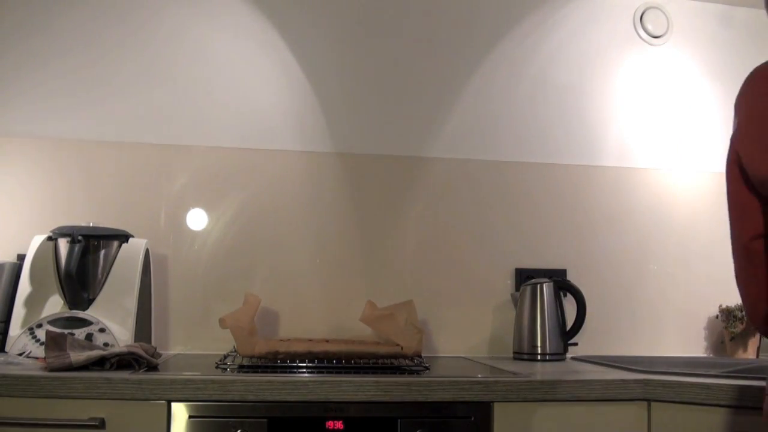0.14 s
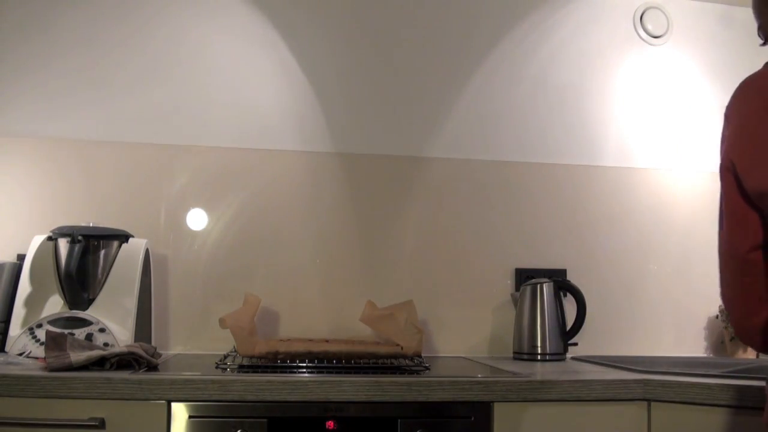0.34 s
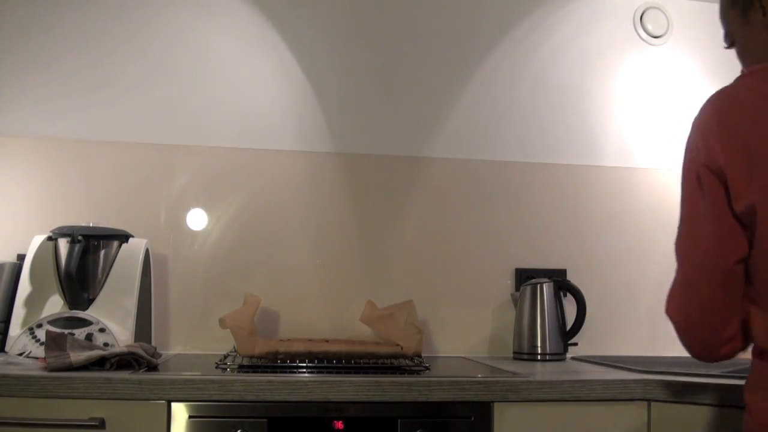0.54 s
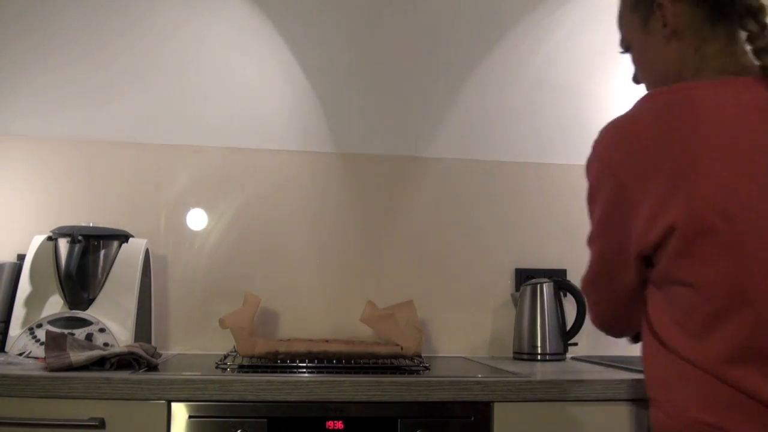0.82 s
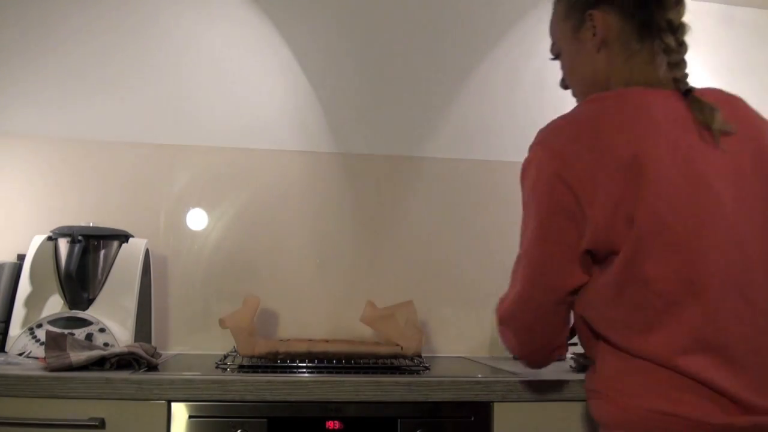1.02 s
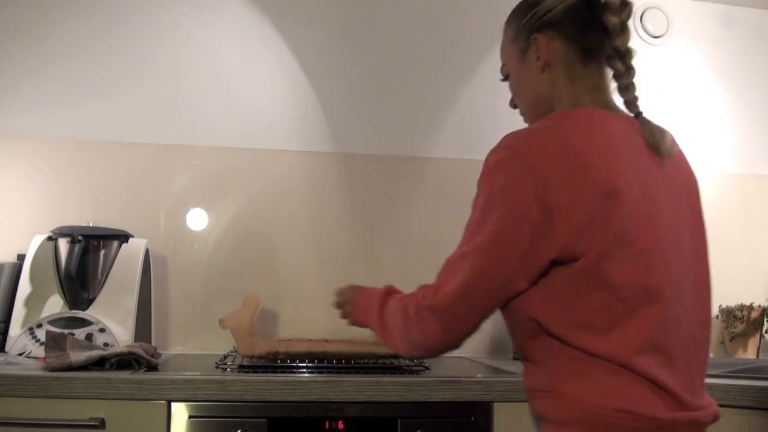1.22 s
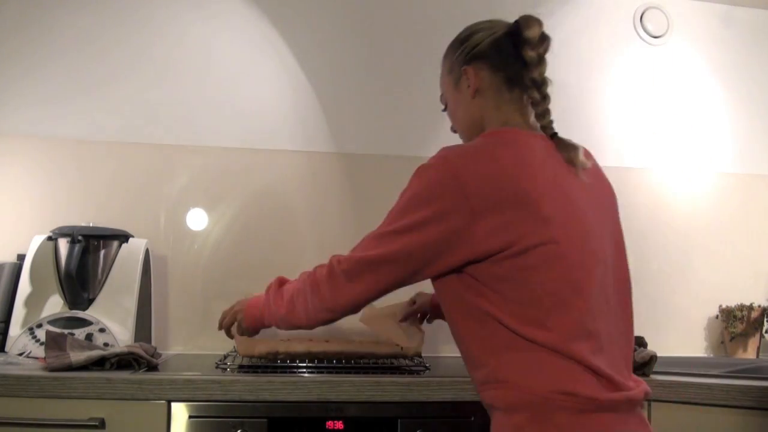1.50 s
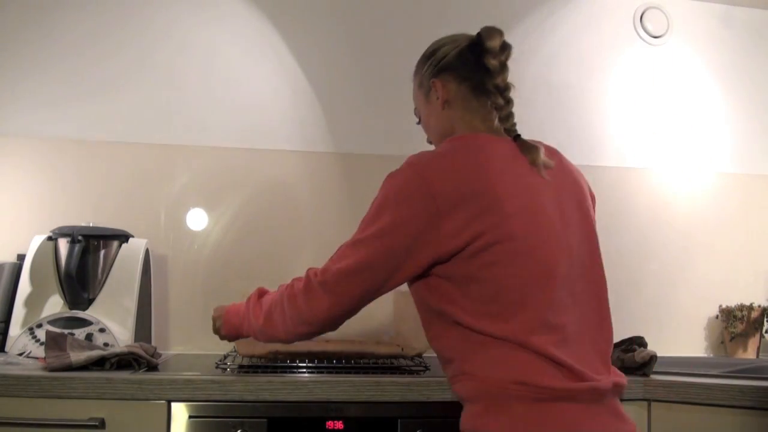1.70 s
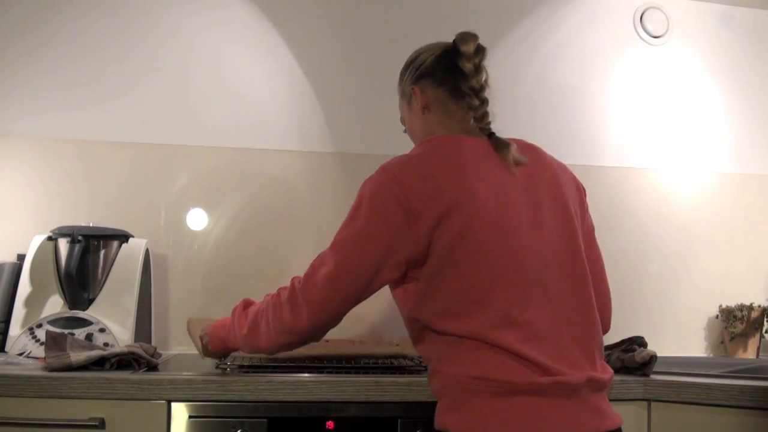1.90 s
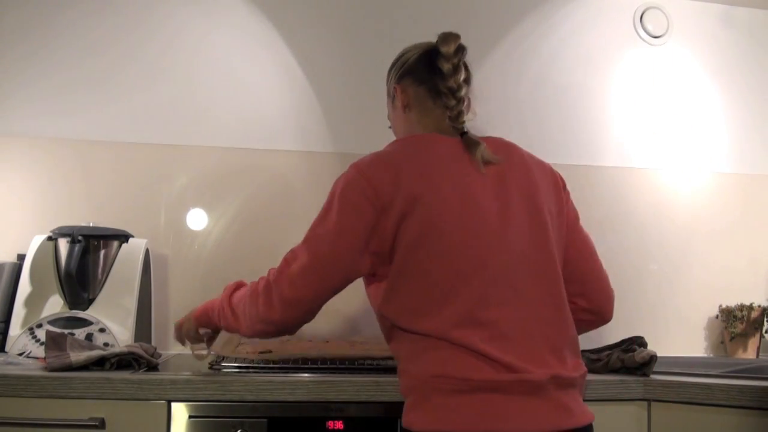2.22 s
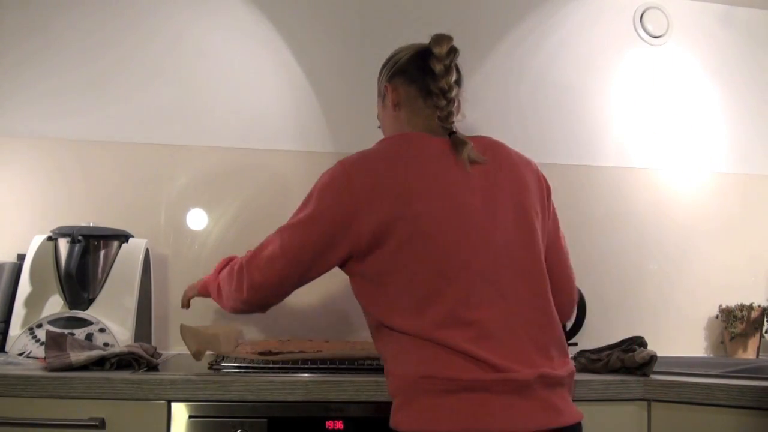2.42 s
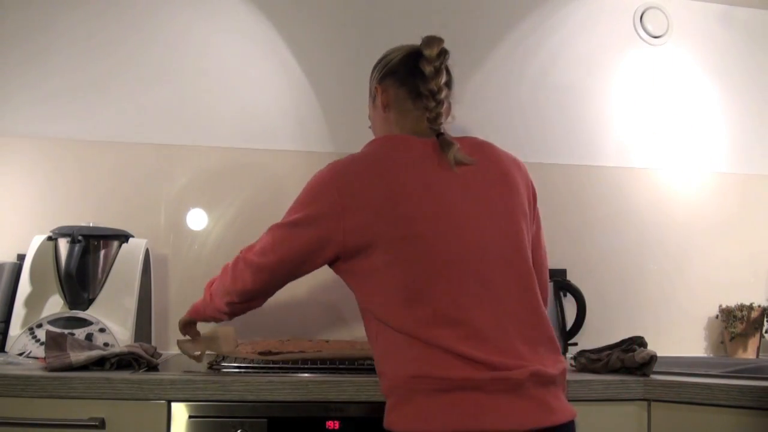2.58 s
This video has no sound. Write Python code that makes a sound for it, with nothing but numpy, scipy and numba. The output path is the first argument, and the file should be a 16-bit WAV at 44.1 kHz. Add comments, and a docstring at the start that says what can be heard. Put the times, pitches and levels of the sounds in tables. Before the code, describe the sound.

Loud crisp paper rustling with sharp creases and a dull scrape; before it, a drawer rumbles and slams with ringing panels, then soft cloth movement. Hard-walled kitchen, quiet room air, somewhat distant camera microphone.

```python
"""First a drawer rolls in, off to one side of a hard-walled kitchen, and bangs shut: rumble and thin tones
of the runners, then noise cracks, a low thud and decaying panel tones. A sleeve swishes over soft steps.
Then hands grip the baking paper under a cake and drag it across a rack: thousands of tiny creases snap
over the dull scrape of the sheet. Each spot has its own reflections and stereo width at the microphone,
over a faint oven fan and room air. The camera's limiter flattens the bang."""
import sys
import numpy as np
from scipy import signal
from scipy.fft import rfft, irfft
from scipy.io import wavfile
from scipy.ndimage import uniform_filter1d
from numba import njit

SR = 44100
rng = np.random.default_rng(int(sys.argv[2]) if len(sys.argv) > 2 else 0)


def persist_wave(psi):
    """Save psi, clipped to +-1, as 16-bit WAV."""
    counts = np.round(np.clip(psi, -1, 1) * 32767).astype(np.int16)
    wavfile.write(sys.argv[1], SR, np.atleast_2d(counts).T)


N = 121275  # samples, 2.75 s

# All levels are relative, ahead of the limiter; colours give only the shape of a spectrum.
# How hard the paper is worked: gripped, dragged, eased, worked again [t/s, level/dB]
PAPER_EFFORT = [(1.58, -76), (1.602, -22.5), (1.628, -17), (1.715, -20), (1.75, -23), (1.812, -22),
                (1.885, -17), (2.02, -23.5), (2.10, -28), (2.185, -38), (2.21, -27), (2.245, -28),
                (2.285, -15.5), (2.35, -22.5), (2.40, -33.5), (2.46, -54), (2.53, -56), (2.62, -38),
                (2.645, -36.5), (2.705, -37.5), (2.745, -24.5)]
# The sheet sliding under the cake's weight [t/s, level/dB]
SLIDE = [(1.6, -49.5), (1.645, -32.5), (1.75, -40.5), (1.83, -36), (1.93, -33.5), (2.04, -40), (2.19, -66),
         (2.33, -36.5), (2.45, -60), (2.75, -44.5)]
# Single loud creases [t/s, level/dB]
SNAPS = [(1.602, -6), (1.6097, 2), (1.622, 6), (1.638, 7), (1.706, 9), (1.829, 8), (1.88, 7), (2.195, 8),
         (2.272, 3), (2.439, -1), (2.6308, -5), (2.656, -9)]
# Colour of the creases [f/Hz, level/dB]
PAPER_COLOUR = [(120, -42), (250, -17), (400, -11), (900, -10), (1500, -3), (2200, 0), (3500, 0), (6000, 0),
                (8000, -2), (10000, -5.5), (12000, -8), (14000, -13), (16000, -17.5)]
# Colour of the scrape [f/Hz, level/dB]
SLIDE_COLOUR = [(80, -18), (200, -8.5), (330, 1), (800, 1), (1400, -2), (3000, -4.5), (8000, -43)]
CREASES_PER_S, CREASE_SPREAD_DB, CREASE_DECAY_S = 1200, 4, 0.00027
FOLDS_PER_S, FOLD_DB = 60, 3  # creases come in flurries
SNAP_T60_S, SNAP_DULL_HZ = 0.026, 7100
PAPER_DB, DULL_HZ, BRIGHTEN = 0.5, 5000, 0.24  # harder work gives more treble (dB per dB)

# Contacts as the drawer shuts: the blow, then its contents settling [t/s, level/dB]
BLOWS = [(0.2253, 18), (.239, 15.5), (.254, 19), (.29, 8), (.327, 13.5)]
# Colour of a contact [f/Hz, level/dB]
BLOW_COLOUR = [(30, -42), (70, -22.5), (150, -12.5), (280, -3), (600, 0.5), (850, -3.5), (1300, -2),
               (2000, -6.5), (2650, -8), (3100, -11), (4100, -19.5), (6500, -23), (9500, -33.5),
               (16000, -47.5)]
# Panel modes of the drawer [f/Hz, level/dB]
PANELS = [(238, -11), (266, -9), (344, -3), (419, -5), (534, -6), (617, -5), (667, -1), (1101, -5),
          (1147, -7), (1227, -3), (1487, 1), (1583, -5), (1686, -7), (1875, -8), (1992, -7), (2057, -8)]
CRACK_T60_S, PANEL_DB, PANEL_T60_S, PANEL_BUILD_S = 0.015, -0.5, 0.73, 0.035
THUD_DB, THUD_HZ, THUD_T60_S = -2.5, 116, 0.31  # the cabinet's low thud

# Resonances of the rollers [f/Hz, width/Hz, level/dB]
ROLLERS = [(590, 14, -4), (705, 8, 0), (1070, 14, -1.5), (1228, 18, -7), (1490, 14, -11), (1708, 14, -12)]
# Colour of their rumble [f/Hz, level/dB]
ROLL_COLOUR = [(60, -21), (150, -7), (300, -3), (600, 1.5), (850, -5), (1100, 0), (1500, -9), (2200, -11),
               (3500, -22.5), (7000, -28), (15000, -49)]
# The roll starts PUSH_DB louder and settles with time constant PUSH_S
ROLL_DB, ROLL_RING_DB, PUSH_DB, PUSH_S = -39.5, -0.5, 11.5, 0.033
ROLL_WAVER = 0.36  # noise beside each tone: roughness of the runners' song

# Swishes of a sleeve [t/s, length/s, level/dB]
SWISHES = [(0.561, 0.11, -49.5), (.755, 0.031, -51.5), (.96, 0.027, -62), (1.046, 0.036, -73),
           (1.186, 0.03, -48), (1.278, 0.091, -53), (1.374, 0.0057, -46.5), (1.5, .05, -56)]
# Colour of the cloth [f/Hz, level/dB]
CLOTH_COLOUR = [(200, -9), (1500, -9), (4000, -2.5), (7000, 0), (11000, -4.5), (16000, -15.5)]
# Soft steps and bumps [t/s, level/dB, f/Hz]
STEPS = [(0.134, -19, 85), (0.149, -6.5, 200), (.186, -5.5, 453), (.965, -17.5, 583), (1.08, -21, 1200),
         (1.375, -19.5, 350)]
SWISH_ATTACK_S, SWISH_RELEASE_S, STEP_T60_S = 0.0046, 0.0067, 0.094

# Tones of the oven fan [f/Hz, level/dB]
FAN_HUM = [(142, -63), (187, -63)]
# Colour of the room air [f/Hz, level/dB]
AIR_COLOUR = [(15, -48), (25, -3.5), (92, -1), (149, -2), (301, 3), (516, -6), (607, -1.5), (1370, -9.5),
              (1840, -9.5), (7110, -17), (14800, -24.5), (16000, -24)]
AIR_DB = -52

# The kitchen's decay [f/Hz, t60/s]
ROOM_T60 = [(100, 0.6), (500, 0.61), (1500, 0.82), (2800, 0.8), (5000, 0.78), (9000, 0.52), (16000, 0.28)]
# Stereo width of the drawer, side over mid [f/Hz, level/dB]
DRAWER_WIDTH = [(80, -21), (330, -16.5), (500, -11.5), (660, -10), (900, -4.5), (1100, -8), (1900, -9),
                (2500, -7.5), (3800, -10), (4400, -15), (7600, -22), (9500, -13), (11000, -3), (15000, -5)]
# Stereo width of the worktop, side over mid [f/Hz, level/dB]
WORKTOP_WIDTH = [(80, -26), (350, -24), (600, -15.5), (850, -7.5), (1100, -13), (1350, -8.5), (1650, -12),
                 (2600, -10), (4100, -11), (5500, -19.5), (9300, -14.5), (10500, -5.5), (12500, -2.5),
                 (15500, -11)]
# Stereo width of the air and the cook, side over mid [f/Hz, level/dB]
AIR_WIDTH = [(60, -25), (110, -20), (200, -22), (380, -12.5), (700, -8.5), (1290, -4), (2380, -3.5),
             (4400, -6.5), (8120, -11.5), (15000, -2)]
ROOM_ONSET_S = 0.0012
# Direct sound over reflections: lower sounds further from the microphone
PAPER_DIRECT_DB, DRAWER_DIRECT_DB, ROLL_DIRECT_DB, CLOTH_DIRECT_DB = -10.5, -12.5, -6, -3.5
LIMIT_DB, LIMIT_ATTACK_S, LIMIT_RELEASE_S, TOP_HZ = -12.5, 0.00056, 0.028, 15750


def paper(count=6):
    """Several patches of the sheet rustle at once on the worktop; a few creases snap loudly."""
    patches = sum(in_kitchen(paper_patch(), PAPER_DIRECT_DB, WORKTOP_WIDTH) for _ in range(count))
    rustle = patches / np.sqrt(count)
    snaps = colour(sum(undb(db) * burst(s, SNAP_T60_S) for s, db in SNAPS), PAPER_COLOUR)
    snaps = signal.lfilter(*signal.butter(1, SNAP_DULL_HZ, fs=SR), snaps)
    return rustle + in_kitchen(snaps, PAPER_DIRECT_DB, WORKTOP_WIDTH)


def paper_patch():
    """One patch of the sheet: creases snap in flurries, brighter under effort, over a lower scrape."""
    effort = curve(PAPER_EFFORT)
    held = seconds() > PAPER_EFFORT[0][0]
    crinkle = grains(CREASES_PER_S, CREASE_SPREAD_DB, CREASE_DECAY_S) * undb(effort + PAPER_DB) * held
    dull = signal.lfilter(*signal.butter(1, DULL_HZ, fs=SR), crinkle)
    treble_gain = undb(BRIGHTEN * (effort - effort.max()) + 0.5)
    # dull and bright parts waver independently
    crinkle = dull * flurries() + (crinkle - dull) * flurries() * treble_gain
    scrape = colour(grains(900, 4, 0.00035), SLIDE_COLOUR) * undb(curve(SLIDE)) * held
    return colour(crinkle, PAPER_COLOUR) + scrape


def flurries():
    """A quickly wandering gain, rms 1."""
    knots = rng.standard_normal(1000)
    wander = np.interp(seconds() * FOLDS_PER_S, np.arange(len(knots)), knots)
    return unit(undb(FOLD_DB * wander))


def drawer():
    """Each contact cracks into the room; the cabinet thuds and the panels ring on."""
    cracks = 0
    for start, db in BLOWS:
        crack = undb(db) * colour(burst(start, CRACK_T60_S), BLOW_COLOUR)
        cracks = cracks + in_kitchen(crack, DRAWER_DIRECT_DB, DRAWER_WIDTH)
    thud = burst(BLOWS[0][0], THUD_T60_S)
    for _ in range(2):
        thud = resonate(thud, THUD_HZ, THUD_HZ)
    thud = undb(THUD_DB) * thud / np.linalg.norm(thud)
    return cracks + thud + stereo(panels(), panels(), DRAWER_WIDTH)


def panels():
    """The drawer's panels take up the blow and ring on as decaying tones of random phase."""
    start, blow_db = BLOWS[0]
    t = seconds()
    swell = fade(start, PANEL_T60_S) * (1 - np.exp(-np.abs(t - start) / PANEL_BUILD_S))
    ring = swell * sum(undb(db) * np.sin(2 * np.pi * (hz * t + rng.random())) for hz, db in PANELS)
    return undb(blow_db + PANEL_DB) * ring / np.linalg.norm(ring)


def rollers():
    """The runners rumble and sing until the drawer hits its stop."""
    t = seconds()
    push = undb(ROLL_DB + PUSH_DB * np.exp(-t / PUSH_S)) * (t < BLOWS[0][0])
    rumble = colour(grains(1700, 2.2, 0.00026), ROLL_COLOUR) * push
    song = undb(ROLL_RING_DB) * push * stereo(runner_song(), runner_song(), DRAWER_WIDTH)
    return song + in_kitchen(rumble, ROLL_DIRECT_DB, DRAWER_WIDTH)


def runner_song():
    """Thin tones of the runners, each roughened by narrow noise at its pitch; rms 1."""
    song = 0
    for hz, width, db in ROLLERS:
        tone = np.sin(2 * np.pi * (hz * seconds() + rng.random()))
        # the second half of the noise is past the resonance's build-up
        rough = unit(resonate(rng.standard_normal(2 * N), hz, width)[N:])
        song = song + undb(db) * (tone + ROLL_WAVER * rough)
    return unit(song)


def cook():
    """Cloth swishes as coloured grains; soft steps as resonant noise bursts."""
    t = seconds()
    rub = 0
    for start, length, db in SWISHES:
        attack = np.clip((t - start) / SWISH_ATTACK_S, 0, 1)
        release = np.exp(-np.maximum(t - start - length, 0) / SWISH_RELEASE_S)
        rub = rub + undb(db) * attack * release
    steps = 0
    for start, db, hz in STEPS:
        narrowing = np.sqrt(SR / (np.pi * hz))  # makes up the energy the resonance removes
        steps = steps + undb(db) * narrowing * resonate(burst(start, STEP_T60_S), hz, hz)
    return rub * colour(grains(5000, 2.4, 0.00024), CLOTH_COLOUR) + steps


def oven_fan():
    """Steady hum: noise through pairs of narrow resonances."""
    hum = 0
    for hz, db in FAN_HUM:
        tone = resonate(resonate(rng.standard_normal(N), hz, 8.6), hz, 8.6)
        hum = hum + undb(db) * unit(tone)
    return hum


def air():
    """Quiet room noise, steady and coloured."""
    return undb(AIR_DB) * colour(rng.standard_normal(N), AIR_COLOUR)


def in_kitchen(x, direct_db, width):
    """A sound from one spot of the kitchen, with that spot's own reflections."""
    direct = undb(direct_db)
    mid = (direct * x + convolve(x, room_tail())) / np.hypot(1, direct)
    return stereo(mid, convolve(x, room_tail()), width)


def room_tail():
    """Dense reflections of tiles and walls; each band dies at its own rate."""
    hz = np.fft.rfftfreq(N, 1 / SR)
    noise, out = rfft(rng.standard_normal(N)), 0
    for (_, t60), share in zip(ROOM_T60, np.eye(len(ROOM_T60))):
        shape = fade(0, t60) * (1 - np.exp(-seconds() / ROOM_ONSET_S))
        # overlapping bands, each peaking at its own row
        band = at_hz(np.c_[np.array(ROOM_T60)[:, 0], share], hz)
        out = out + irfft(noise * band, N) * shape / np.linalg.norm(shape)
    return out


def stereo(mid, side, width):
    """Left and right from a middle and a side signal."""
    gain = undb(at_hz(width, np.fft.rfftfreq(2 * N, 1 / SR)))
    side = irfft(rfft(side, 2 * N) * gain)[:N]
    return np.array([mid + side, mid - side])


def grains(rate, spread_db, decay_s):
    """Random tiny snaps, each with its own size and pitch; rms 1."""
    count = int(rate * N / SR)
    when, pitch, chance = rng.random((count, 3)).T
    age = np.arange(128) / SR
    size = undb(spread_db * np.minimum(-np.log(1 - chance), 3))  # a few are much louder
    tones = np.cos(np.pi * SR * pitch[:, None] * age)
    rings = size[:, None] * np.exp(-age / decay_s) * tones
    places = (when * N).astype(int)[:, None] + np.arange(len(age))
    return unit(np.bincount(places.ravel(), rings.ravel(), N)[:N])


def burst(start, t60):
    """A decaying crack of noise with unit energy."""
    x = rng.standard_normal(N) * fade(start, t60)
    return x / np.linalg.norm(x)


def fade(start, t60):
    """Exponential decay from a given moment, 60 dB in t60 seconds."""
    age = seconds() - start
    return (age >= 0) * np.exp(-np.log(1000) * np.abs(age) / t60)


def resonate(x, hz, width):
    """One resonance, gain 1 at its centre."""
    return signal.lfilter(*signal.iirpeak(hz, hz / width, fs=SR), x)


def colour(x, rows):
    """Causal minimum-phase filter with the given spectrum; white noise keeps its power."""
    size = 4096
    cep = irfft(np.log(undb(at_hz(rows, np.fft.rfftfreq(size, 1 / SR)))))
    # fold the cepstrum so that the response starts at once
    cep[1:size // 2] *= 2
    cep[size // 2 + 1:] = 0
    response = irfft(np.exp(rfft(cep)))
    return convolve(x, response / np.linalg.norm(response))


def convolve(x, response):
    """Pass a sound through a response."""
    return signal.fftconvolve(x, response)[:N]


def at_hz(rows, hz):
    """Read (f/Hz, value) rows on a log-frequency axis."""
    f, v = np.array(rows).T
    return np.interp(np.log(hz + 1), np.log(f), v)


def curve(rows):
    """Join (t/s, value) rows by straight lines."""
    return np.interp(seconds(), *np.array(rows).T)


def seconds():
    """The time of each sample."""
    return np.arange(N) / SR


def unit(x):
    """Scale to rms 1."""
    return x / np.sqrt(np.mean(x ** 2))


def undb(db):
    """Decibels to gain."""
    return 10 ** (np.asarray(db) / 20)


def scene():
    """Paper, drawer and cook over the quiet kitchen."""
    near = paper() + drawer() + rollers()
    person = in_kitchen(cook(), CLOTH_DIRECT_DB, AIR_WIDTH)
    return near + person + oven_fan() + stereo(air(), air(), AIR_WIDTH)


@njit
def follow(power, attack, release):
    """Level detector that rises fast and falls slowly."""
    out, e = np.empty(len(power)), 0.
    for i in range(len(power)):
        e += (power[i] - e) * (attack if power[i] > e else release)
        out[i] = e
    return out


def record(dry):
    """The camera's fast limiter holds the bang down on both channels alike; the top is cut."""
    power = uniform_filter1d(np.mean(dry ** 2, axis=0), size=200)
    smooth = follow(power, 1 / (LIMIT_ATTACK_S * SR), 1 / (LIMIT_RELEASE_S * SR))
    heard = np.sqrt(np.abs(smooth))
    limited = dry / np.maximum(1, heard / undb(LIMIT_DB))
    return signal.sosfilt(signal.ellip(10, .2, 80, TOP_HZ, fs=SR, output="sos"), limited)


dry = scene()
out = record(dry)
persist_wave(out)
```